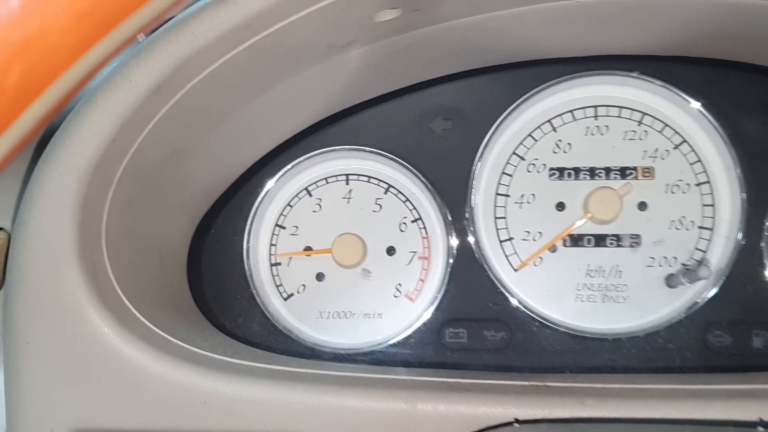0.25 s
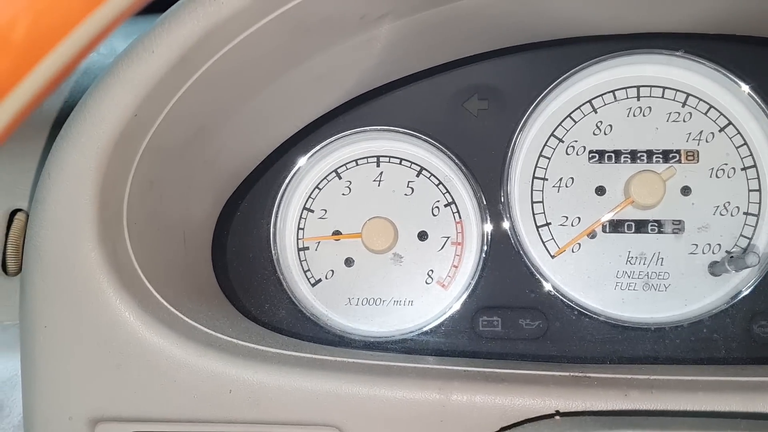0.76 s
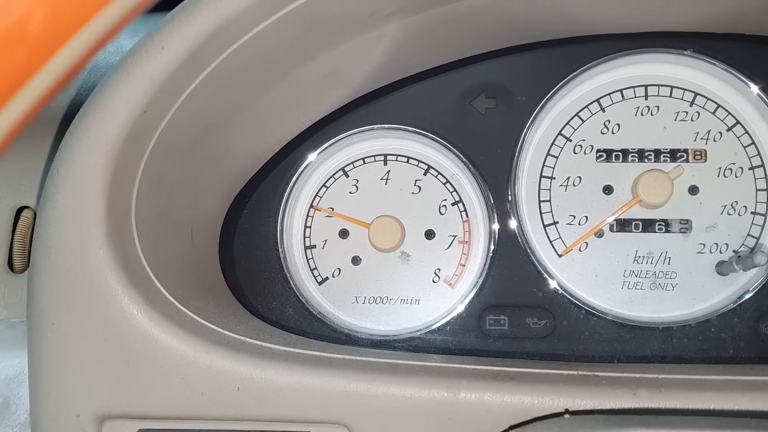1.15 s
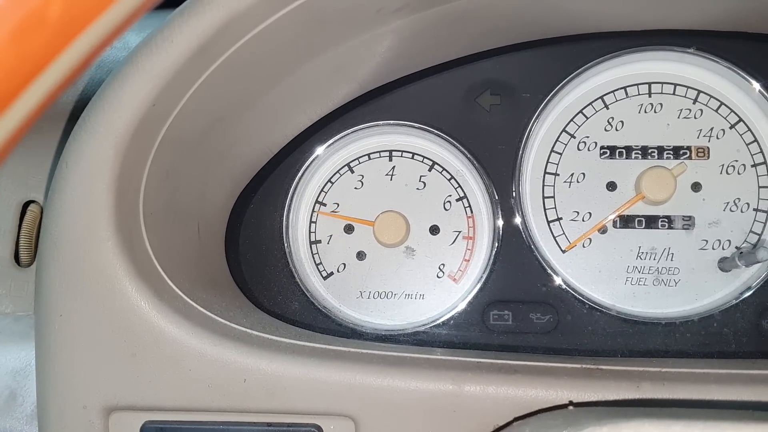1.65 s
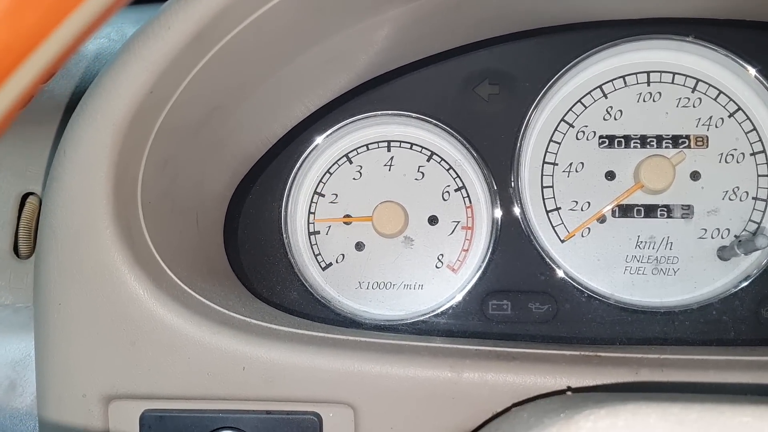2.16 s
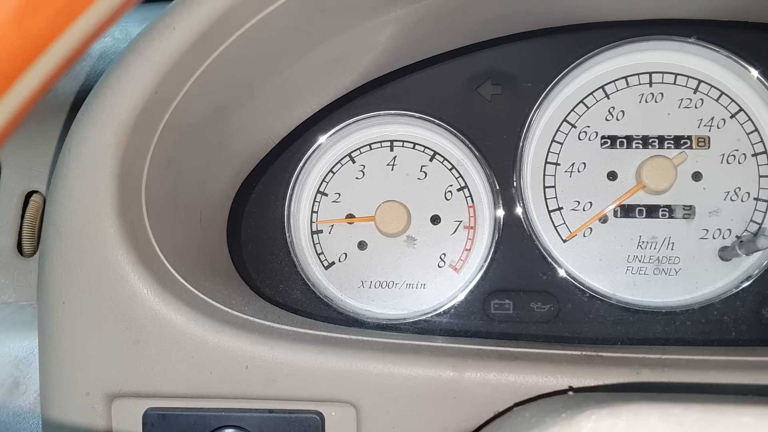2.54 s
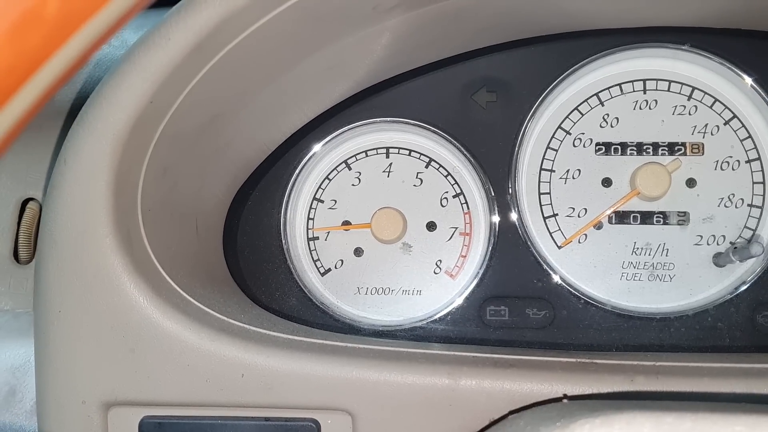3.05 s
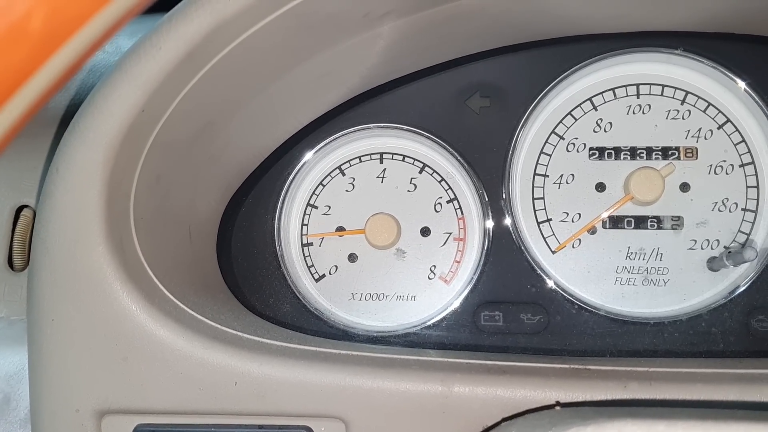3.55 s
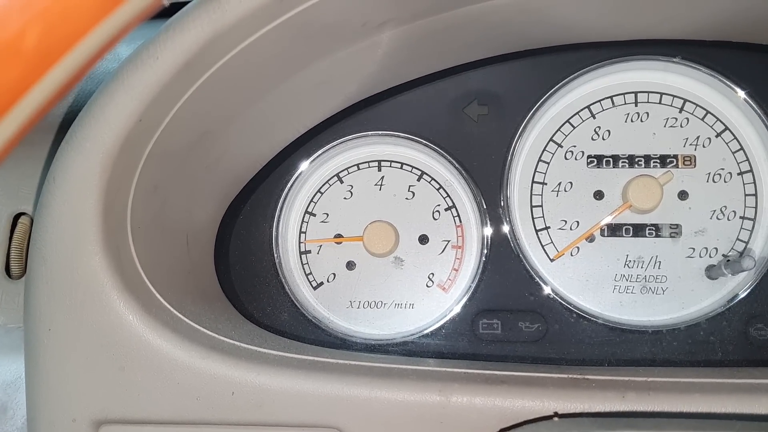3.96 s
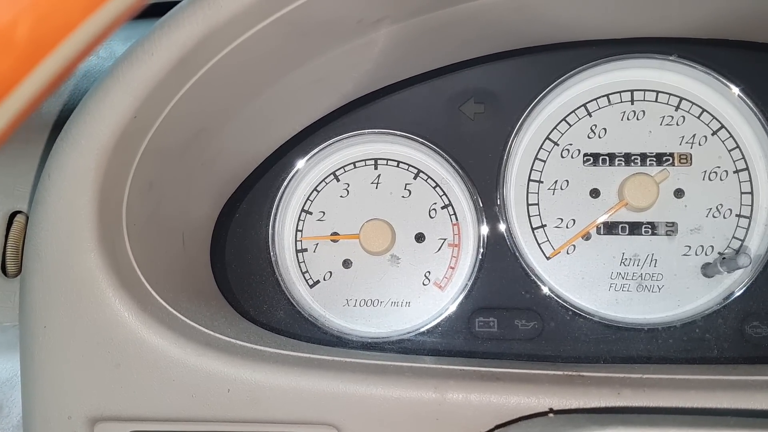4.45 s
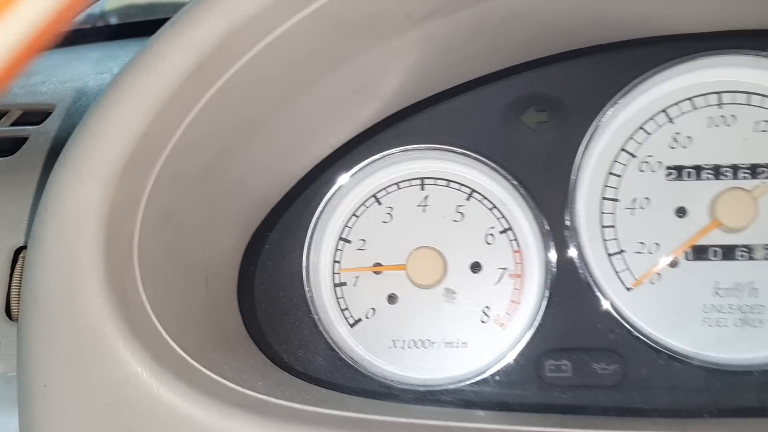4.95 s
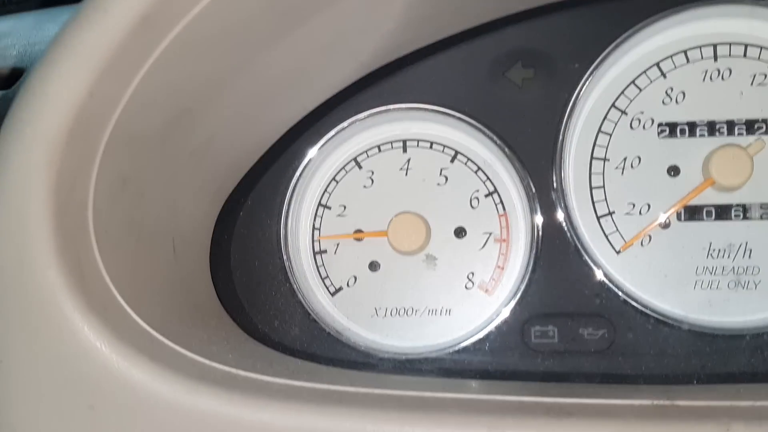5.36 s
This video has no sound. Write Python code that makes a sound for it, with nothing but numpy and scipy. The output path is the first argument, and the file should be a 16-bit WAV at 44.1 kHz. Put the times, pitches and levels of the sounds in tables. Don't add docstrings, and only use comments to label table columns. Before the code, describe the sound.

A small car idles in its cabin, revs up briefly around one second, stumbles back to idle, then a click, a clack and a fan joins.

```python
import sys
import numpy as np
from scipy import signal
from scipy.fft import rfft, irfft, next_fast_len
from scipy.io import wavfile
from scipy.ndimage import uniform_filter1d

SR = 44100
rng = np.random.default_rng(int(sys.argv[2]) if len(sys.argv) > 2 else 0)


def int16_out(signal):
    q = np.round(np.clip(np.atleast_2d(signal).T, -1, 1) * 32767)
    wavfile.write(sys.argv[1], SR, q.astype(np.int16))


def voltage_ratio(level):
    return 10 ** (np.asarray(level, float) / 20)


N = 246959
T = np.arange(N) / SR
LONG = next_fast_len(N + N % 2, True)
F = np.maximum(np.arange(LONG // 2 + 1) * SR / LONG, 1.)
IDLE_HZ = 40
BULKHEAD_HZ, BULKHEAD_DB = 256.7, -14

# time_s, firing_hz, throttle_db (over idle)
ENGINE_RUN = [(0, 39.8, -1), (.87, 39.53, -1), (.96, 48.26, 4.5), (1.07, 64.8, 3), (1.16, 70.5, 6),
              (1.27, 76.5, 1.5), (1.34, 75.04, -3), (1.43, 68.23, -6.5), (1.5, 60.1, -3.5),
              (1.62, 55.5, -5), (1.7, 50, -4), (1.8, 48.13, -1), (2.12, 40.54, -0.5), (3.0, 39.99, 1),
              (3.3, 39.25, 2), (3.7, 40.72, 3.5), (4.15, 42.26, 0.5), (5.6, 42.72, -1.5)]
# idle_db, db_per_throttle_db, clutch_drag_db, fan_at_speed_db
ORDER_LAWS = [
    (-33, -0.9, 4, -1.5),
    (-34, 1.2, -2.5, -13),
    (-34, 0.9, 3, -1.5),
    (-38.5, 0.74, 7.5, -5),
]
# time_s, shaft_hz, second_order_db
FAN_RUN = [(3.45, 27.5, -46), (3.6, 29.4, -40), (3.75, 31.6, -34), (3.9, 33.1, -31), (4.05, 34.1, -29),
           (4.25, 34.9, -27.5), (4.5, 35.4, -28), (4.85, 35.7, -28), (5.6, 35.72, -28)]
# freq_hz, lag_samples
PORT_LAG = [(60, 9), (300, 10), (650, 11), (950, 19), (2000, 20)]
# freq_hz, shared_power_0_to_1
LIKENESS = [(30, .88), (200, .85), (350, .6), (700, .62), (1300, .55), (2500, .38), (6000, .22),
            (12000, .3)]
# freq_hz, left_minus_right_db
SIDES = [(60, -4), (110, 2), (200, -1.5), (380, 0), (700, 2), (1290, 1), (2380, 1.5), (4400, 2), (8120, 4),
         (15000, 7)]


def columns(table):
    time_s, *rest = np.transpose(table)
    return [np.interp(T, time_s, column) for column in rest]


def on_hz(table, at_hz):
    hz, value = np.transpose(table)
    return np.interp(np.log(at_hz), np.log(hz), value)


def unit(x):
    return x / np.sqrt(np.mean(x ** 2))


def walk(rate_hz):
    steps = int(N / SR * rate_hz * 4) + 9
    coarse = uniform_filter1d(rng.standard_normal(steps), size=4)
    coarse = uniform_filter1d(coarse, size=3)
    return np.interp(T, np.linspace(0, N / SR, steps), unit(coarse))


def diffuse(colour, rings=()):
    like = np.clip(on_hz(LIKENESS, F), 0, 1)
    shared, left, right = rfft(rng.standard_normal((3, LONG)))
    mix = np.sqrt(like) * shared + np.sqrt(1 - like) * np.array([left, right])
    colour_db = on_hz(colour, F)
    for hz, width_hz, lift_db in rings:
        colour_db = colour_db + lift_db / (1 + (2 * (F - hz) / width_hz) ** 2)
    inside = (F > colour[0][0] / 2) & (F < colour[-1][0] * 1.1)
    tilt = voltage_ratio(on_hz(SIDES, F) / 2)
    delay = np.exp(-2j * np.pi * F * on_hz(PORT_LAG, F) / SR)
    ports = np.array([tilt, delay / tilt])
    return unit(irfft(mix * ports * voltage_ratio(colour_db) * inside, LONG)[:, :N])


def orders(shaft_hz, multiples, wobble_db, slip_rad, rate_hz, apart_rad):
    turns, out = np.cumsum(shaft_hz) / SR, 0
    for k, db in multiples:
        mean_hz = k * np.mean(shaft_hz)
        phase = 2 * np.pi * (k * turns + rng.random()) + slip_rad * np.sqrt(k) * walk(rate_hz)
        lag = 2 * np.pi * k * shaft_hz * on_hz(PORT_LAG, mean_hz) / SR
        lag = lag + apart_rad * walk(rate_hz / 2)
        bulkhead_db = BULKHEAD_DB * np.clip((k * shaft_hz - BULKHEAD_HZ) / 20, 0, 1)
        line_db = db + wobble_db * walk(rate_hz) + bulkhead_db
        pan_db = on_hz(SIDES, mean_hz) / 2
        left = voltage_ratio(pan_db) * np.sin(phase)
        right = voltage_ratio(-pan_db) * np.sin(phase - lag)
        out = out + np.sqrt(2) * voltage_ratio(line_db) * np.array([left, right])
    return out


def effort(idle_db, db_per_throttle_db, db_per_octave, drag_db):
    firing_hz, throttle_db = columns(ENGINE_RUN)
    clutch_s, drag_rise_s = 2.8, 0.52
    drag = np.tanh(np.maximum(T - clutch_s, 0) / drag_rise_s)
    speed_db = db_per_octave * np.log2(firing_hz / IDLE_HZ)
    return idle_db + db_per_throttle_db * throttle_db + speed_db + drag_db * drag


def firing_db(order):
    # freq_hz, gain_db over the idle lines
    cabin_modes = [(40, 0.5), (60, 1.5), (80, 0), (100, 1), (122, 0.5), (145, -7.5), (175, 1), (230, -2)]
    # centre_s, order_1_db, half_length_s, db_per_higher_order
    surges = [(0.87, -30.5, .025, -6), (0.992, -20, 0.042, -1.5), (1.064, -14.5, 0.035, -10),
              (1.152, -21, 0.03, -5), (1.247, -22, 0.037, -9), (1.388, -17, 0.077, -11),
              (1.52, -22.5, 0.016, -10.5), (1.636, -17.5, 0.034, -15), (1.784, -26, 0.058, -7.5),
              (1.97, -27.5, 0.044, -8), (3.707, -28, 0.1532, -7.5), (4.25, -31.5, 0.2, -13)]
    fan_full_s, fan_rise_s = 3.54, 0.097
    idle_db, db_per_throttle_db, drag_db, fan_db = ORDER_LAWS[order]
    fan = .5 + .5 * np.tanh((T - fan_full_s) / fan_rise_s)
    cabin_db = on_hz(cabin_modes, (order + 1) * columns(ENGINE_RUN)[0])
    size = voltage_ratio(effort(idle_db, db_per_throttle_db, 0, drag_db) + fan_db * fan)
    for centre_s, db, half_s, tilt_db in surges:
        size = size + voltage_ratio(db + order * tilt_db) * np.exp(-((T - centre_s) / half_s) ** 2)
    return 20 * np.log10(size) + cabin_db


def engine():
    minor_orders = [2.5, 3.5, 4.5, 5, 5.5, 6, 7, 8, 9, 11]
    minor_order_db = [-13, -19, -10, -9.5, -6.5, -7, -11, -3.5, -4, -31]
    # freq_hz, density_db_per_hz
    boom_colour = [(18, -12), (28, -2), (50, 5.5), (90, 1.5), (150, -2), (200, -6), (250, -7), (300, -16.5)]
    lump_db, lump_hz = 1.6, 6
    rough_db_per_octave, rough_hz = 5, 22
    boom_db = -11

    hz = columns(ENGINE_RUN)[0]
    order_db = [firing_db(order=k) for k in range(len(ORDER_LAWS))]
    order_db[0] = order_db[0] + lump_db * walk(lump_hz) * (IDLE_HZ / hz) ** 2
    rough_db = rough_db_per_octave * np.log2(hz / IDLE_HZ)
    order_db[1:] = [db + rough_db * walk(rough_hz) for db in order_db[1:]]
    main = orders(hz, enumerate(order_db, start=1), wobble_db=1.1, slip_rad=.055, rate_hz=14, apart_rad=.25)

    lean_db = .35 * uniform_filter1d(order_db[3], size=6000) - 26.5
    weaker = [(k, db + lean_db) for k, db in zip(minor_orders, minor_order_db)]
    minor = orders(hz, weaker, wobble_db=2, slip_rad=.08, rate_hz=8, apart_rad=.6)

    load = np.sqrt(sum(voltage_ratio(db) ** 2 for db in order_db))
    boom = voltage_ratio(boom_db) * uniform_filter1d(load, size=4000) * diffuse(boom_colour)
    return main + minor + boom


def shakes():
    # start_s, level_db, mode_hz, rise_s, t60_s
    panel_shakes = [(.95, -28, 203, .04, .6), (.945, -33, 372, .03, .7), (.95, -37, 300, .03, .5),
                    (1.14, -35, 405, .05, .5), (1.12, -29, 224, .04, .3), (1.12, -36, 310, .05, .5),
                    (1.15, -30, 166, .04, .4), (1.24, -33, 172, .04, .4), (1.15, -38, 470, .04, .5),
                    (1.0, -38, 520, .08, .6), (1.518, -22, 135, .004, .11), (1.518, -25, 215, .004, .1),
                    (1.624, -23, 125, .004, .12), (1.625, -23, 205, .004, .11), (1.704, -26, 140, .004, .1),
                    (1.705, -30, 215, .004, .09), (1.79, -36, 190, .01, .15), (1.85, -44, 400, .02, .2),
                    (3.12, -35, 233, .05, .3), (3.06, -48, 293, .1, 2.5)]
    out = np.zeros((2, N))
    for start_s, db, hz, rise_s, t60_s in panel_shakes:
        age_s = np.maximum(T - start_s, 0)
        decay = np.exp(-np.log(1000) * np.maximum(age_s - rise_s, 0) / t60_s)
        shape = np.minimum(age_s / rise_s, 1) * decay
        phase = 2 * np.pi * hz * age_s + .5 * walk(20)
        lag = 2 * np.pi * hz * on_hz(PORT_LAG, hz) / SR
        out += np.sqrt(2) * voltage_ratio(db) * shape * np.sin([phase, phase - lag])
    return out


def mechanics():
    # freq_hz, density_db_per_hz
    hiss_colour = [(500, -14), (850, -9), (996, -21.5), (1130, -8), (1230, -1.5), (1450, -3), (1600, -4),
                   (2520, -8), (3210, -8), (3910, -9), (4750, -13.5), (5630, -16.5), (11300, -30),
                   (14200, -31.5), (15700, -37)]
    # freq_hz, width_hz, lift_db
    metal_rings = [(1195, 22, 6), (1655, 70, 4), (1970, 14, 7), (2460, 45, 4), (2745, 60, 3), (3488, 25, 4),
                   (3832, 30, 5), (4620, 20, 10), (5900, 50, 3), (6900, 120, 2), (12800, 110, 6)]
    # freq_hz, density_db_per_hz
    rumble_colour = [(200, -48), (260, -10), (320, -6), (400, -5.5), (500, -6.5), (580, -12.5), (680, -5.5),
                     (760, -5), (850, -9), (1000, -11), (1300, -15)]
    hiss_db = effort(idle_db=-44.5, db_per_throttle_db=0.28, db_per_octave=10, drag_db=4.5)
    rumble_db = effort(idle_db=-46, db_per_throttle_db=0.65, db_per_octave=12, drag_db=5.5)
    hiss = voltage_ratio(hiss_db + .6 * walk(12)) * diffuse(hiss_colour, metal_rings)
    rumble = voltage_ratio(rumble_db + 1.02 * walk(14)) * diffuse(rumble_colour)
    return hiss + rumble


def tone(run, multiples, fade_s, wobble_db):
    hz, db = columns(run)
    since_s = T - run[0][0] + fade_s
    left_s = run[-1][0] + fade_s - T
    gate = np.clip(np.minimum(since_s, left_s) / fade_s, 0, 1)
    return gate * voltage_ratio(db) * orders(hz, multiples, wobble_db, slip_rad=0.037, rate_hz=7.9, apart_rad=0.26)


def cooling_fan():
    fan_orders = [1, 1.5, 2, 3, 4, 5, 6, 7, 9, 14, 19, 21]
    fan_order_db = [-20, -11.5, 0, -15, -5, -19, -11.5, -10.5, -10, -10.5, -34, -11.5]
    return tone(FAN_RUN, zip(fan_orders, fan_order_db), fade_s=.25, wobble_db=1.1)


def wash():
    # freq_hz, density_db_per_hz
    wash_colour = [(40, -18), (90, 5.5), (160, 3.5), (240, 1.5), (290, -10), (400, -23)]
    hz = columns(FAN_RUN)[0]
    spin = np.clip((T - 3.1) / .5, 0, 1) * (hz / hz[-1]) ** 3
    return voltage_ratio(-34.0) * spin * diffuse(wash_colour)


def lagging_shaft():
    # time_s, shaft_hz, level_db
    lagging_run = [(1.14, 41.34, -38), (1.22, 47.2, -23), (1.28, 50.24, -26), (1.33, 52.3, -29),
                   (1.39, 55.4, -44)]
    return tone(lagging_run, [(1, 0), (2, -12)], fade_s=.04, wobble_db=1.2)


def whine():
    # time_s, pitch_hz, level_db
    whine_run = [(0, 536, -51), (.75, 536, -50), (.95, 536, -66), (2.0, 540, -64), (2.3, 540, -56),
                 (3, 540, -57), (3.5, 536, -58), (4.5, 533, -54), (5.6, 533, -54)]
    return tone(whine_run, [(1, -BULKHEAD_DB)], fade_s=.1, wobble_db=1.5)


def burst(start_s, rise_s, hold_s, scrape_db, bands):
    pan_db = np.array([[1], [-1]])
    scrape = voltage_ratio(scrape_db * walk(120))
    age_s = np.maximum(T - start_s, 0)
    out = np.zeros((2, N))
    for low_hz, high_hz, db, t60_s in bands:
        decay = np.exp(-np.log(1000) * np.maximum(age_s - rise_s - hold_s, 0) / t60_s)
        shape = np.minimum(age_s / rise_s, 1) * decay
        band = signal.butter(2, [low_hz, min(high_hz, 20000)], "bandpass", fs=SR, output="sos")
        noise = unit(signal.sosfilt(band, rng.standard_normal((2, N))))
        out += voltage_ratio(db + pan_db) * shape * scrape * noise
    return out


def relay():
    # low_hz, high_hz, level_db, t60_s
    relay_bands = [(1300, 3000, -39.5, .04), (3100, 3700, -35.5, .05), (4200, 5300, -34.5, .05),
                   (5300, 7000, -38.5, .045), (8500, 15600, -44, .045)]
    return burst(start_s=2.418, rise_s=.0006, hold_s=.003, scrape_db=1, bands=relay_bands)


def clutch():
    # low_hz, high_hz, level_db, t60_s
    clutch_bands = [(591, 2970, -39, 0.22), (2976, 7500, -42, .15), (4010, 4580, -46, .18),
                    (7990, 17300, -48, .12), (6000, 14000, -53.5, 1.0)]
    return burst(start_s=3.012, rise_s=.007, hold_s=.03, scrape_db=1.5, bands=clutch_bands)


def still_air():
    # freq_hz, density_db_per_hz
    air_colour = [(3000, -1), (7000, -6), (12000, -4.5), (15700, -5.5)]
    return voltage_ratio(-61.5) * diffuse(air_colour)


def scene():
    car = engine() + shakes() + mechanics()
    shafts = cooling_fan() + wash() + lagging_shaft() + whine()
    return car + shafts + relay() + clutch() + still_air()


def low_pass(x):
    return signal.sosfilt(signal.butter(12, 16500, fs=SR, output="sos"), x)


def record(dry):
    top_hz = 15700
    top_cut = signal.ellip(12, .2, 85, top_hz, fs=SR, output="sos")
    return low_pass(signal.sosfilt(top_cut, dry))


dry = scene()
out = record(dry)
int16_out(out)
```